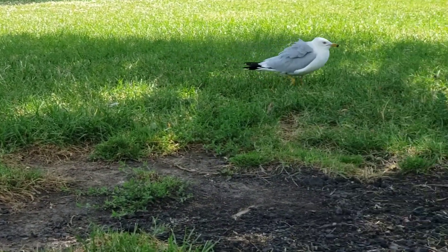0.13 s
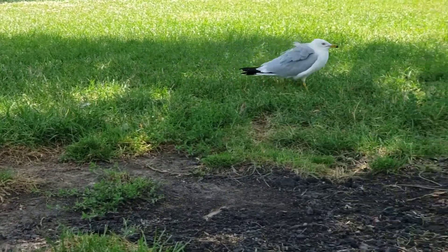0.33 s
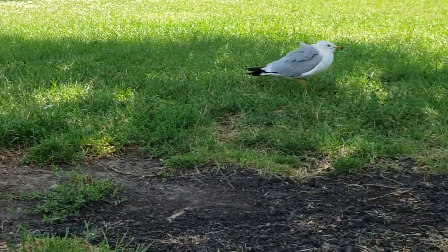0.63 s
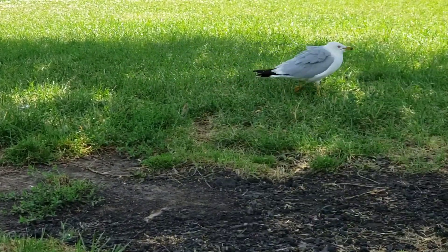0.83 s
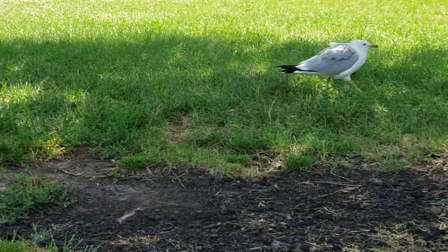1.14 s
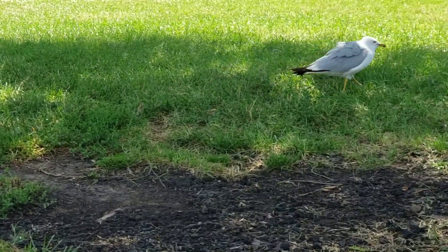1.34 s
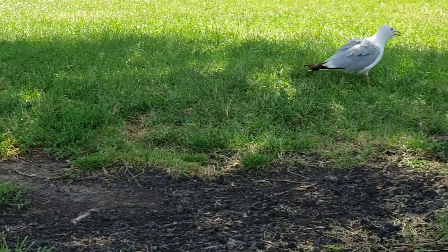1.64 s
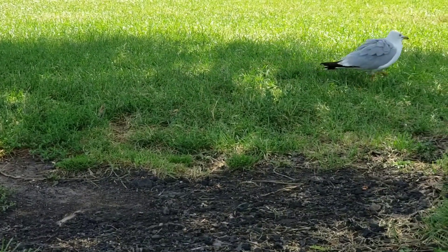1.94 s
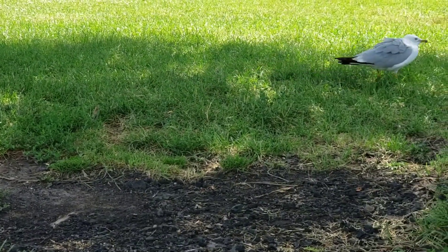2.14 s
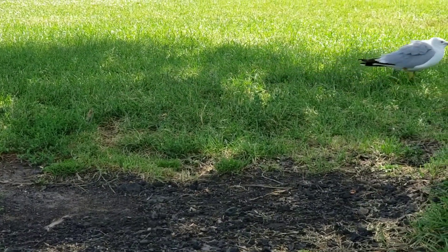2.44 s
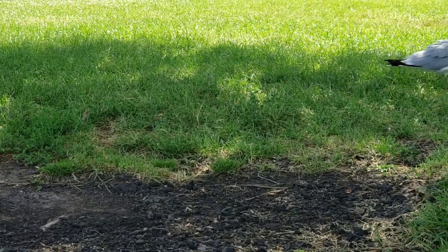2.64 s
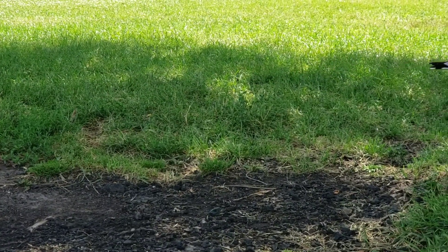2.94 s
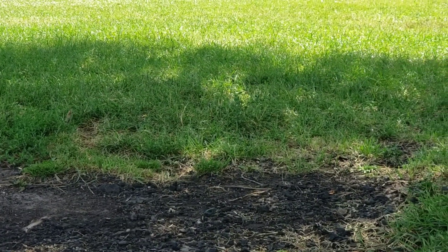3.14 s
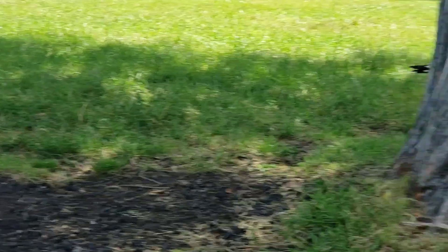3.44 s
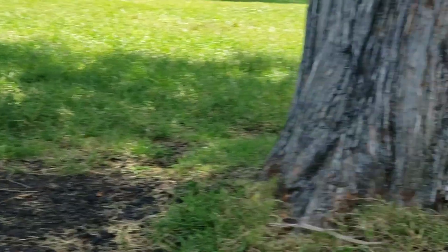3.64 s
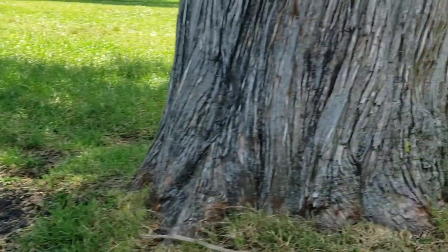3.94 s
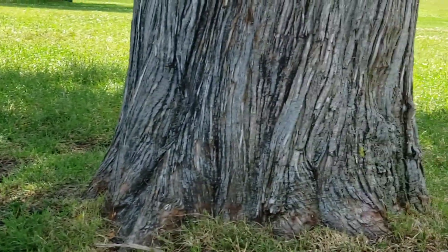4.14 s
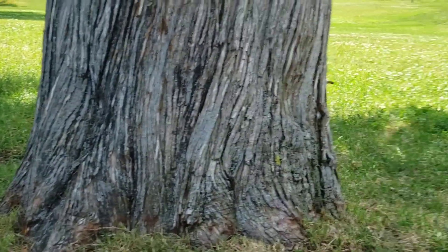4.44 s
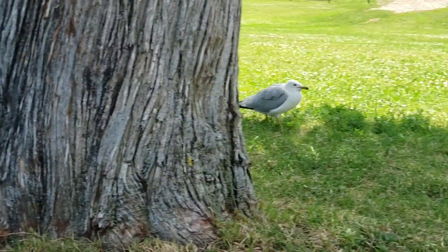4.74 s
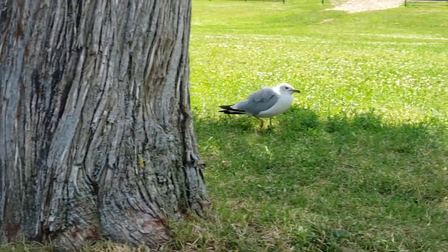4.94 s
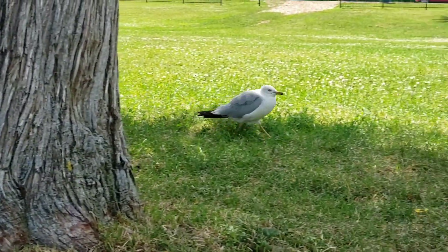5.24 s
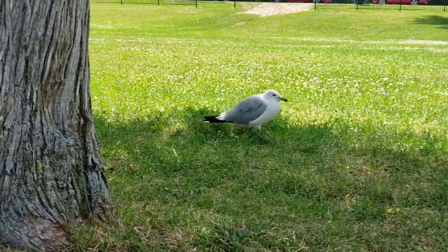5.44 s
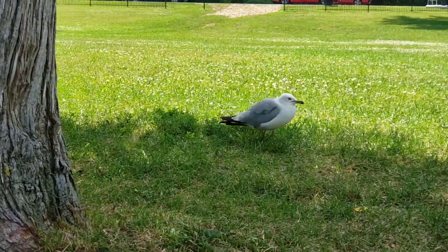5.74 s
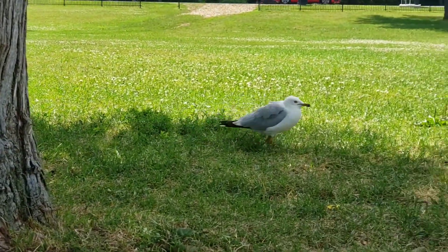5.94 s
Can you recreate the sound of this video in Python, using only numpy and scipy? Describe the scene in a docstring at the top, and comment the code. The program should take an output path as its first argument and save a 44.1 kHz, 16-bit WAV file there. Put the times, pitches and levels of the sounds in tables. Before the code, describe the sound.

A gull calls twice on a park lawn: a bright, breaking cry, then a raspy, more distant one with a little echo. Before the calls, wind briefly buffets the left side of the microphone; after them come a few faint, crisp footsteps in grass. Thin sparrow chirps are scattered all the way through, above a steady low rumble and a soft wash of distant traffic and leaves.

```python
"""A gull on a park lawn

A gull gives two falling calls: a clear one that breaks between registers, then a hoarse one.
Its voice box makes a stack of overtones, which its throat and beak shape. Sparrows chirp in the
trees, over a low rumble and the hiss of the open air. Early on a gust buffets the left
microphone; later a few steps rustle the grass."""
import sys
import numpy as np
from scipy import signal
from scipy.fft import rfft, irfft, next_fast_len
from scipy.io import wavfile
from scipy.ndimage import uniform_filter1d

SR = 44100
rng = np.random.default_rng(int(sys.argv[2]) if len(sys.argv) > 2 else 0)


def wav_out(sig):
    """Save sig, one row per channel (or a flat mono array), as 16-bit PCM at SR to the path in sys.argv[1]."""
    wavfile.write(sys.argv[1], SR, np.round(np.clip(np.atleast_2d(sig).T, -1, 1) * 32767).astype(np.int16))


N = 268789
TIME = np.arange(N) / SR

# the gull's pitch in each call; it jumps where the voice changes register: (time [s], pitch [Hz])
CLEAR_CALL_PITCH = [(1.566, 384), (1.588, 493), (1.602, 534), (1.613, 589), (1.633, 573), (1.640, 650),
                    (1.641, 802), (1.70, 727), (1.736, 715), (1.762, 798), (1.80, 747), (1.848, 703),
                    (1.862, 595), (1.889, 521.4), (1.897, 560), (1.918, 550)]
HOARSE_CALL_PITCH = [(3.155, 517), (3.195, 702), (3.232, 751), (3.385, 661.5), (3.46, 655), (3.47, 565.5),
                     (3.51, 518), (3.545, 457)]
# the voice catches for an instant in the clear call: (time [s], half length [s], depth [dB])
VOICE_CATCHES = [(1.598, .005, 3), (1.665, 0.0026, 3), (1.688, 0.0061, 15), (1.749, .003, 9),
                 (1.889, .003, 7)]
# how the gull's beak and windpipe shape its voice: (frequency [Hz], gain [dB])
BEAK_TONE = [(250, -40), (400, -14), (570, -6.5), (740, 3), (1100, -3), (1500, -3), (1900, -1), (2400, -3),
             (3100, -1), (3500, -3.5), (3950, 0.5), (4700, -3), (5400, -12), (8000, -42)]
# air forced past the gull's voice box: (frequency [Hz], gain [dB])
BREATH_TONE = [(3000, -30), (7000, -7), (9500, 0), (11500, 0), (13000, -18), (16000, -22)]
# sparrow chirps:
# (time [s], pitch [Hz], level [dB], length [s], opening arch gain [dB], rasp [share of pitch])
SPARROW_CHIRPS = [(0.255, 4500, -50, 0.094, 1, .035), (0.558, 4750, -43.5, 0.076, 1, .03),
                  (1.352, 4500, -53, 0.092, -2, .04), (1.937, 4590, -43, .072, -5, .032),
                  (2.462, 4540, -50.5, 0.085, -3.5, 0.033), (3.072, 4630, -44.5, 0.066, -9, .028),
                  (3.561, 4510, -44.5, .095, -3, 0.038), (4.319, 4570, -43.5, 0.085, -3, 0.043),
                  (5.44, 4610, -42, 0.073, -1.5, 0.028), (6.042, 4510, -38.5, .115, 0, 0.029)]
# a chirp is a two-voiced arch, then two lower chips:
# (position [share of length], pitch [factor], gain [dB], upper voice against lower [dB])
CHIRP_OUTLINE = [(0, .93, -5, 0), (.11, 1, 0.5, -2), (.23, 0.97, 0.5, -0.5), (.29, .93, -8.5, 2),
                 (.35, .87, 2.5, -3), (.45, .88, 1, -14), (.54, .77, -8, -8), (.63, .85, -6, -12),
                 (.73, .83, 0, -8), (.84, .8, -1.5, -11), (1, 0.756, -13, -14)]
# whistles, slurs and buzzes of small birds:
# (time [s], length [s], start pitch [Hz], end pitch [Hz], level [dB], warble [factor])
BIRD_NOTES = [(0.343, .08, 3230, 3290, -53, 0.1), (0.702, 0.072, 4040, 4360, -53.5, 0.12),
              (.702, 0.085, 3190, 3280, -53.5, 0.25), (1.403, 0.046, 4000, 3560, -51.5, 0.9),
              (2.046, 0.015, 4230, 4550, -53, 0.22), (2.679, 0.098, 3390, 3450, -56, 0.9),
              (2.809, 0.17, 4350, 4305, -61, 0.14), (3.152, .03, 3980, 3950, -53, .24),
              (3.191, 0.035, 4660, 4700, -52, 0.35), (3.466, 0.066, 4260, 3650, -53, 0.72),
              (3.507, 0.055, 3450, 2650, -46, 0.6), (4.14, 0.057, 2522, 2540, -54, 0.32),
              (4.239, 0.025, 4200, 3380, -51.5, .5), (4.28, 0.018, 3150, 3710, -45, 0.5),
              (4.703, 0.045, 4300, 4390, -45, 0.28), (4.71, 0.042, 5100, 4700, -54, 0.47),
              (4.721, .07, 3785, 2744, -42, 1.06), (4.741, 0.063, 4150, 3670, -46, 0.45),
              (5.611, 0.038, 4080, 4050, -51.5, 0.15), (5.651, 0.068, 3870, 4520, -55, 1.8),
              (5.688, 0.032, 3530, 3350, -50, 1.06)]
# rustles and snaps of grass underfoot: (time [s], length [s], level [dB])
GRASS_RUSTLES = [(.18, 0.0069, -53), (4.102, 0.13, -62), (4.113, .006, -55), (4.126, 0.0074, -45.5),
                 (4.181, .005, -54), (4.292, .17, -59.5), (5.322, .005, -53), (5.338, 0.11, -61),
                 (5.466, 0.008, -48), (5.463, 0.1, -61), (5.52, .005, -55), (5.63, .12, -64),
                 (5.666, 0.0059, -44), (5.784, 0.075, -65), (6.05, .05, -58)]
# the crisp tone of grass: (frequency [Hz], gain [dB])
GRASS_TONE = [(500, -18), (2000, -3), (4000, 10), (5500, -3), (8000, 1), (10000, -11), (14000, -11.5)]
# swirls of wind that thump the left microphone: (time [s], length [s], level [dB], upper edge [Hz])
WIND_THUMPS = [(.305, 0.072, -30, 140), (0.404, .05, -31, 98), (0.553, 0.02, -26.5, 272),
               (.588, .06, -23, 120), (.655, .065, -26, 170), (0.717, .042, -26, 264),
               (0.819, 0.057, -23.5, 257), (.86, .09, -21, 125), (.895, 0.067, -25.5, 220),
               (0.983, 0.026, -28, 141)]
# the gust builds slowly, then drops: (time [s], level [dB])
GUST_SWELL = [(0, -47), (.32, -33), (.52, -39.5), (.62, -29), (.79, -29.5), (.9, -23), (.95, -27),
              (1.02, -55)]
# the gust's tone, applied on top of the rumble's: (frequency [Hz], gain [dB])
GUST_TONE = [(30, 5), (70, 2.5), (130, 2), (200, 4), (280, -2), (450, 0), (1000, -11)]
# the slow swell of the rumble: (time [s], level [dB])
RUMBLE_SWELL = [(0.0, -38), (0.8, -35.5), (1.12, -40), (2.16, -39), (2.24, -38), (2.8, -38), (3.04, -40),
                (3.36, -35.5), (3.44, -39.5), (4.32, -37.5), (4.56, -37), (5.36, -37.5), (5.52, -37),
                (5.76, -42), (6.0, -40), (6.08, -37.5)]
# the deep tone of the rumble: (frequency [Hz], gain [dB])
RUMBLE_TONE = [(10, -21), (22, -30), (42, -7.5), (60, 1.5), (78, -4), (120, -6), (160, -11.5), (230, -14),
               (300, -20.5), (400, -29), (700, -40.5), (2000, -72)]
# the rumble dips briefly on the left: (time [s], length [s], depth [dB])
RUMBLE_DIPS = [(0.994, 0.18, 19), (1.29, 0.19, 16), (1.588, 0.15, 15), (2.355, 0.3, 42), (3.395, 0.11, 14),
               (3.765, 0.28, 8.5), (5.673, 0.19, 27), (6.027, 0.068, 17)]
# the swell of the open air, in its lower body and in its high hiss: (time [s], gain [dB])
AIR_BODY_SWELL = [(0, 1.5), (.3, 3.5), (.75, 4.5), (1.05, -1.5), (3.0, -1.7), (3.9, 2.5), (5.0, 1.5),
                  (6.09, -1.6)]
AIR_HISS_SWELL = [(0, 0.5), (.3, 2.6), (.75, 2.5), (1.05, -2.1), (3.0, -1.9), (3.4, 1), (3.9, -0.5),
                  (4.25, 0.8), (4.7, 0.6), (5.3, 0.5), (6.09, -0.2)]
# the tone of the open air: (frequency [Hz], left gain [dB], right gain [dB])
AIR_TONE = [(30, -18, -24), (207, 4.5, 3), (450, 0, -4), (620, -1, -1), (964, 3, 2), (1650, -4, -4.5),
            (1930, -4.5, -4), (2370, -4.5, -4), (2830, -7.5, -6), (3600, -7, -6), (4720, -12.5, -12),
            (6330, -14, -17.5), (8040, -15, -19), (9300, -19, -31), (11300, -19.5, -35.5),
            (15500, -32.5, -40)]
# how alike the air sounds on the left and right: (frequency [Hz], likeness [0 to 1])
AIR_STEREO_LIKENESS = [(200, 1), (700, 0.049), (1400, 0.39), (4000, 0.27), (7000, 0.043), (15000, .05)]


def gull():
    """Two calls from nearly straight ahead; the second is farther off, with more echo from the trees."""
    clear, hoarse = np.zeros(N), np.zeros(N)
    add(clear, *clear_call())
    add(hoarse, *hoarse_call())
    direct = amp(1.0) * microphones(clear + hoarse, right_late_ms=-0.073, left_db=-0.27)
    return direct + park_echo(amp(-12.5) * clear + amp(-5.0) * hoarse, fade_s=0.54, first_s=0.013)


def clear_call(base_db=-34.5, sag_db_per_s=23, open_hz=1920, closing_hz_per_s=2750, dulling_db_per_s=41):
    """Bright at first, then duller as the beak closes; the voice stumbles, splits and thins to a hoot."""
    t = np.arange(CLEAR_CALL_PITCH[0][0], CLEAR_CALL_PITCH[-1][0], 1 / SR)
    age, slack = t - t[0], slackness(t, attack_s=0.031, release_s=0.022)
    slide = during(t, 1.55, 1.612, edge=0.03)  # a rasping upward start
    gape = during(t, 1.55, 1.668, edge=0.011)  # the beak is wide open
    split = during(t, 1.746, 1.822, edge=0.011)  # strong and weak vibrations take turns
    hoot = during(t, 1.822, 1.85, edge=0.011)  # the throat rings lower, nearer the pitch
    closed = during(t, 1.85, 2, edge=0.012)
    catch_db = sum(depth * np.exp(-((t - s) / width) ** 2) for s, width, depth in VOICE_CATCHES)
    level_db = base_db - sag_db_per_s * age - 18 * slack - catch_db
    level_db -= 6.6 * slide + 4.8 * split + 4 * hoot + 1.5 * gape
    return t[0], gull_voice(
        t, *curves(CLEAR_CALL_PITCH, t), level_db,
        between_db=-28.5 + 34 * split + 9 * slide + 4 * hoot,
        rough=0.14 + 0.1 * split + 0.16 * slide + 0.03 * closed + 0.3 * slack,
        throat_hz=open_hz - closing_hz_per_s * age - 450 * hoot + 300 * slide,
        bright_db=-1 - dulling_db_per_s * age + 7.8 * gape + 5.5 * split,
        treble_db=-0.5 - 2.3 * slide - 3.2 * split,
        throat_db=13, mouth_db=-9 * closed, breath_db=-37,
        pitch_shake=0.04, level_shake=0.92, rasp=0.66)


def hoarse_call(base_db=-45.0, shut_hz=740, open_hz=1170, closing_hz_per_s=700, climax_s=3.36,
                throb_depth=0.55, throb_hz=35):
    """The beak opens; the voice splits, roughens, throbs where pressed hardest and ends in a rasp."""
    t = np.arange(HOARSE_CALL_PITCH[0][0], HOARSE_CALL_PITCH[-1][0], 1 / SR)
    age, slack = t - t[0], slackness(t, attack_s=0.072, release_s=0.11)
    split = during(t, 3.225, 3.495, edge=0.01)
    gape = during(t, 3.225, 3.6, edge=0.01)
    climax = np.exp(-((t - climax_s) / 0.072) ** 2)
    level_db = base_db - 9 * slack + 0.87 * climax
    voice = gull_voice(
        t, *curves(HOARSE_CALL_PITCH, t), level_db,
        between_db=-8 + 14.3 * split + 8.8 * climax,
        rough=0.17 + 0.383 * climax + 0.37 * slack,
        throat_hz=shut_hz + (open_hz - closing_hz_per_s * age - shut_hz) * gape,
        bright_db=2.5 - 35 * age, treble_db=-7,
        throat_db=11, mouth_db=7.0 - 20 * age - 4.4 * climax, breath_db=-27.5,
        pitch_shake=0.062, level_shake=0.32, rasp=1.8)
    throb = 1 + throb_depth * climax * np.cos(2 * np.pi * throb_hz * (t - climax_s))
    return t[0], voice * throb


def gull_voice(t, pitch, level_db, between_db, rough, throat_hz, bright_db, treble_db,
               throat_db, mouth_db, breath_db, pitch_shake, level_shake, rasp, waver_db=3.0):
    """The voice box makes overtones; strong and weak vibrations in turn add tones halfway between."""
    size = len(t)
    cycles = np.cumsum(pitch * (1 + pitch_shake * rough * wobble(size, 150))) / SR
    voice, power = np.zeros(size), np.zeros(size)
    for k in range(1, 29):  # odd k are the in-between tones
        hz = pitch * k / 2
        throat = 1 + amp(throat_db) / (1 + ((hz - throat_hz) / 130) ** 2)
        # the overtones fade as the beak closes, the highest ones most when the bird faces away
        tilt_db = bright_db * np.clip((hz - 1600) / 700, 0, 1)
        tilt_db += treble_db * np.clip((hz - 2000) / 2000, 0, 1)
        # the mouth colours the middle overtones, and each one wavers by itself
        colour_db = mouth_db / (1 + ((hz - 1780) / 325) ** 2) + waver_db * wobble(size, 46)
        strength = throat * amp(look_up(BEAK_TONE, hz) + tilt_db + colour_db)
        tone = strength * amp(between_db * (k % 2))
        # uneven vibrations smear each tone into a band of rasp
        rasp_gain = rasp * rough * strength / np.sqrt(throat)
        smear = rasp_gain * (wobble(size, 160) + 1j * wobble(size, 220))
        phase = np.pi * (k * cycles + 2 * rng.random())
        voice += ((tone + smear) * np.exp(1j * phase)).real
        power += tone ** 2 / 2 + rasp_gain ** 2
    tremble = 1 + level_shake * rough * wobble(size, 170)
    breath = amp(breath_db + bright_db) * unit(colour(rng.standard_normal(size), BREATH_TONE))
    return amp(level_db) * (voice / np.sqrt(power) + breath) * tremble * signal.windows.tukey(size, 0.03)


def sparrows(upper_ratio=1.125, under_ratio=0.75, under_db=-9, arch_share=0.27, quaver_db=2.5):
    """Each side of a sparrow's voice box sings a falling tone, over an undertone; other birds twitter."""
    birds = np.zeros(N)
    for start, hz, db, length, arch_db, rasp in SPARROW_CHIRPS:
        size = round(length * SR)
        progress = np.linspace(0, 1, size)
        bend, shape_db, upper_db = curves(CHIRP_OUTLINE, progress)
        shape_db += arch_db * during(progress, -1, arch_share, edge=0.074)
        for ratio, voice_db in ((1, 0), (upper_ratio, upper_db), (under_ratio, under_db)):
            waver = rasp * wobble(size, 420) + 0.012 * wobble(size, 45)
            tone = whistle(hz * bend * ratio * (1 + waver))
            level_db = db + voice_db + shape_db + quaver_db * wobble(size, 180)
            add(birds, start, amp(level_db) * tone * signal.windows.tukey(size, 0.1))
    for start, length, start_hz, end_hz, db, warble in BIRD_NOTES:
        size = round(length * SR)
        pitch = np.linspace(start_hz, end_hz, size) * (1 + 0.06 * warble * wobble(size, 430))
        swell = amp(quaver_db * wobble(size, 120)) * signal.windows.tukey(size, 0.6)
        add(birds, start, amp(db) * unit(whistle(pitch) * swell))
    direct = amp(-3) * microphones(birds, right_late_ms=0.489, left_db=-2.6)
    return direct + amp(-7) * park_echo(birds, fade_s=0.24, first_s=0.003)


def grass(grain_db=6, clump_db=3, clump_hz=200):
    """Blades crackle underfoot in clumps of tiny snaps, mostly on the left."""
    steps = np.zeros(N)
    for start, length, db in GRASS_RUSTLES:
        size = round(length * SR)
        noise = rng.standard_normal(size)
        spikes_db = grain_db * np.minimum(rng.exponential(1, size), 4)
        snaps = noise * amp(spikes_db + clump_db * wobble(size, clump_hz))
        add(steps, start, amp(db) * unit(snaps * np.hanning(size)))
    rustle = colour(steps, GRASS_TONE)
    direct = amp(-1.5) * microphones(rustle, right_late_ms=0.088, left_db=5.0)
    return direct + amp(-5.5) * park_echo(rustle, fade_s=0.079, first_s=0.002)


def wind_thumps(low_edge_hz=42):
    """Each swirl of wind is a short, round puff of deep noise on the left microphone."""
    left = np.zeros(N)
    for start, length, db, top_hz in WIND_THUMPS:
        size = round(length * SR)
        band = signal.butter(4, [low_edge_hz, top_hz], "band", fs=SR, output="sos")
        puff = signal.sosfilt(band, rng.standard_normal(SR // 2))[-size:]
        add(left, start, amp(db) * unit(puff * signal.windows.tukey(size, 0.8)))
    return np.array([left, np.zeros(N)])


def rumble_and_gust(likeness=0.84, flutter_db=2.5, flutter_hz=22, swirl_db=2.5, left_db=-1.5):
    """A low, lumpy rumble on both sides; the left drops out at moments and catches a gust of wind."""
    shared, stray, wind = (unit(colour(rng.standard_normal(N), RUMBLE_TONE)) for _ in range(3))
    level_db, gust_db = curves(RUMBLE_SWELL, TIME)[0], curves(GUST_SWELL, TIME)[0]
    dip_db = sum(depth * np.sin(np.pi * np.clip((TIME - start) / length, 0, 1))
                 for start, length, depth in RUMBLE_DIPS)
    lumps = amp(level_db) * unit(amp(flutter_db * wobble(N, flutter_hz)))
    swirls = unit(colour(wind, GUST_TONE) * amp(swirl_db * wobble(N, 29)))
    gust = amp(gust_db) * (TIME < GUST_SWELL[-1][0]) * swirls
    left = amp(left_db - dip_db) * lumps * blend(shared, stray, likeness)
    return np.array([left + gust, lumps * shared])


def open_air(level_db=-49.0, patchy_db=1.83, right_late_s=0.00045):
    """Distant traffic and leaves: a soft wash from the left, with drifting patches."""
    # the noise is built on a grid of moments and frequencies, then turned into sound
    t = np.arange(N // 256 + 5)[:, None] * 256 / SR
    hz = np.fft.rfftfreq(1024, 1 / SR)
    noise = rng.standard_normal((5, len(t), len(hz)))
    left, stray = noise[0] + 1j * noise[1], noise[2] + 1j * noise[3]
    delayed = left * np.exp(-2j * np.pi * hz * right_late_s)
    right = blend(delayed, stray, look_up(AIR_STEREO_LIKENESS, hz))
    patches = unit(uniform_filter1d(uniform_filter1d(noise[4], size=14, axis=0), size=12, axis=1))
    body_db, hiss_db = curves(AIR_BODY_SWELL, t)[0], curves(AIR_HISS_SWELL, t)[0]
    treble = np.clip((hz - 2500) / 3500, 0, 1)
    grid = np.array([left * amp(look_up(AIR_TONE, hz)), right * amp(look_up(AIR_TONE, hz, column=2))])
    grid *= amp(body_db * (1 - treble) + hiss_db * treble + patchy_db * (1 - 0.5 * treble) * patches)
    wash = signal.istft(grid, nperseg=1024, noverlap=768, time_axis=1, freq_axis=2)[1][:, :N]
    return amp(level_db) * unit(wash)


def park_echo(x, fade_s, first_s):
    """Trunks and leaves scatter a thin echo, different on each side, that falls 60 dB in fade_s."""
    t = TIME[:SR]
    echoes = rng.standard_normal((2, SR)) * (rng.random((2, SR)) < 1 / 20)
    echoes *= amp(-60 * t / fade_s) * (t > first_s)
    echoes /= np.linalg.norm(echoes, axis=1, keepdims=True)
    return signal.fftconvolve(x[None], echoes, axes=1)[:, :N]


def microphones(x, right_late_ms, left_db):
    """A sound reaches the left and right microphones at different times and levels."""
    size = next_fast_len(N + 256)
    delay = np.exp(-2j * np.pi * np.fft.rfftfreq(size, 1 / SR) * right_late_ms / 1000)
    right = irfft(rfft(x, size) * delay, size)[:N]
    return np.array([x * amp(left_db / 2), right * amp(-left_db / 2)])


def amp(db):
    """Turns decibels into a factor to multiply by."""
    return 10 ** (np.asarray(db) / 20)


def unit(x):
    """Scales a signal to an average power of 1."""
    return x / np.sqrt(np.mean(x ** 2) + 1e-20)


def look_up(points, hz, column=1):
    """Reads a table at any frequency, joining its rows on a log-frequency scale."""
    table = np.array(points, float)
    return np.interp(np.log(hz + 1), np.log(table[:, 0] + 1), table[:, column])


def curves(rows, t):
    """Reads each column after the first at the times t."""
    times, *columns = np.transpose(rows)
    return [np.interp(t, np.sort(times), column) for column in columns]


def add(mix, start_s, sound):
    """Adds a sound into the mix at a given time."""
    part = mix[max(round(start_s * SR), 0):][:len(sound)]
    part += sound[:len(part)]


def colour(x, points):
    """Turns frequencies up or down as a tone table says."""
    return irfft(rfft(x) * amp(look_up(points, np.fft.rfftfreq(len(x), 1 / SR))), len(x))


def whistle(pitch):
    """A pure tone that follows a changing pitch."""
    return np.sin(2 * np.pi * np.cumsum(pitch) / SR)


def blend(shared, stray, likeness):
    """Mixes two noises at steady power; a likeness of 1 gives only the shared one."""
    return likeness * shared + np.sqrt(1 - likeness ** 2) * stray


def wobble(size, hz):
    """A smooth random wiggle of about size 1 in value, up to about the given rate."""
    span = next_fast_len(max(size, SR // 2))
    smoothing = np.exp(-(np.fft.rfftfreq(span, 1 / SR) / hz) ** 2)
    return unit(irfft(rfft(rng.standard_normal(span)) * smoothing, span))[:size]


def during(t, start, end, edge):
    """1 between start and end and 0 outside, with sloping edges."""
    return np.clip(np.minimum(t - start, end - t) / edge + 0.5, 0, 1)


def slackness(t, attack_s, release_s):
    """1 at the two ends of a call, 0 while the bird presses fully."""
    return np.clip(1 - np.minimum((t - t[0]) / attack_s, (t[-1] - t) / release_s), 0, 1)


def scene():
    """Everything heard on the lawn."""
    return gull() + sparrows() + grass() + rumble_and_gust() + wind_thumps() + open_air()


def record(dry):
    """Cuts the highest treble, above 15700 Hz."""
    low_pass = signal.firwin(511, 15700, window=("kaiser", 9), fs=SR)
    return signal.oaconvolve(dry, low_pass[None], "same")


dry = scene()
out = record(dry)
wav_out(out)
```